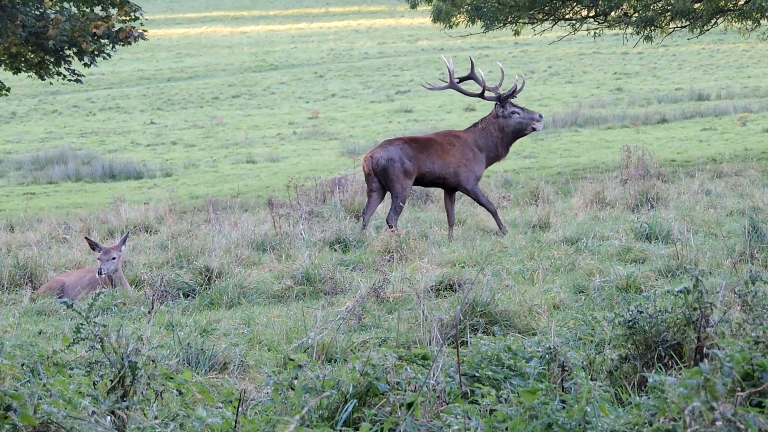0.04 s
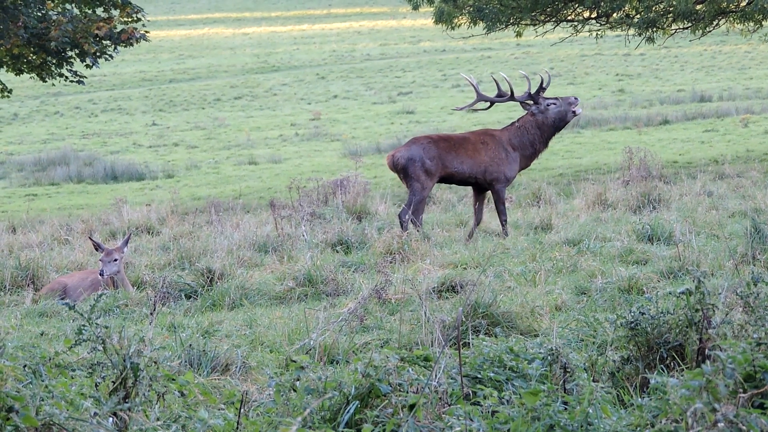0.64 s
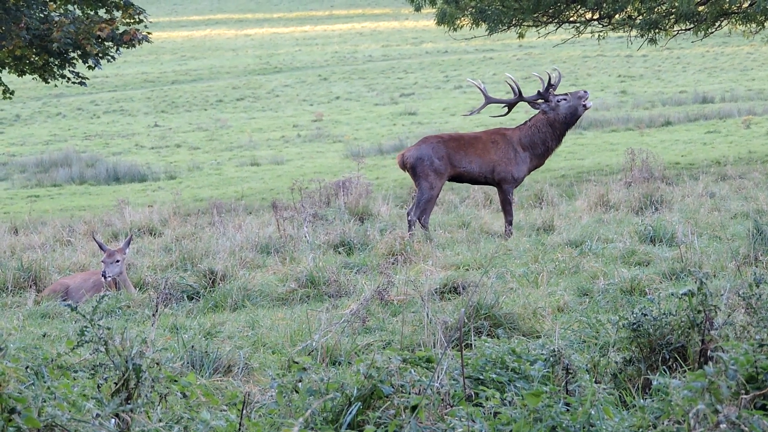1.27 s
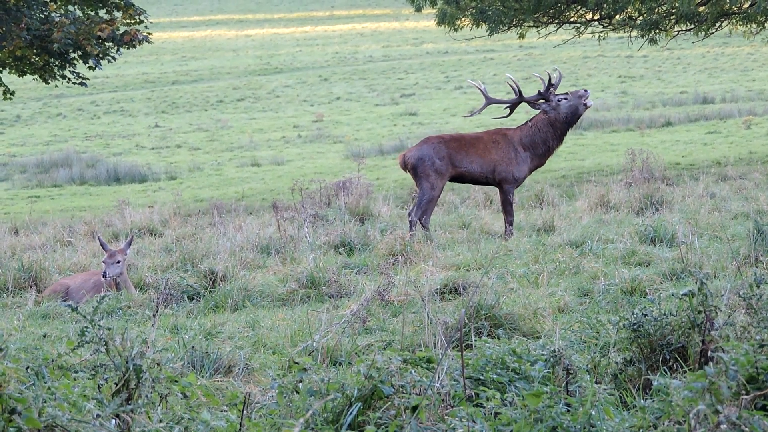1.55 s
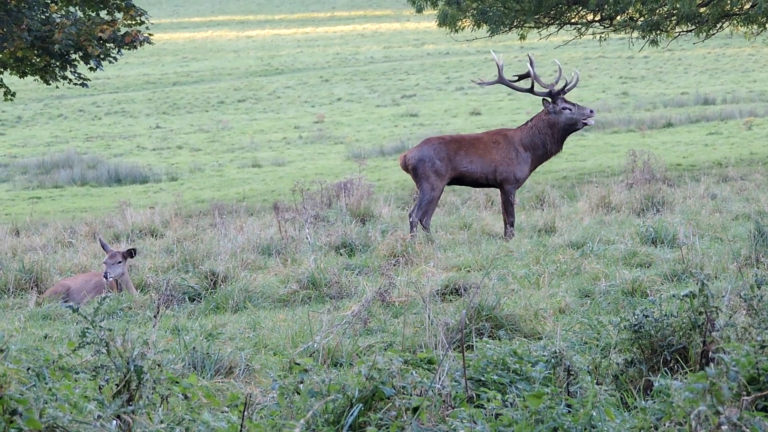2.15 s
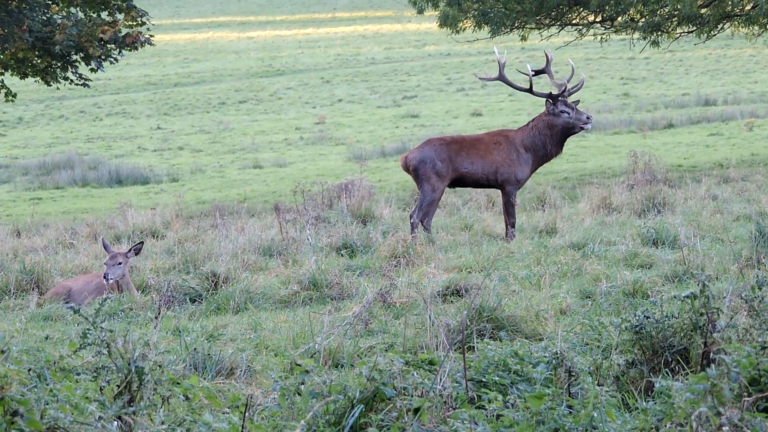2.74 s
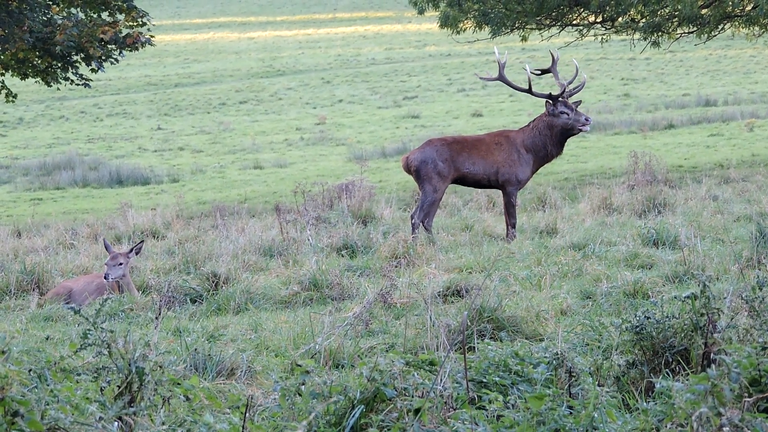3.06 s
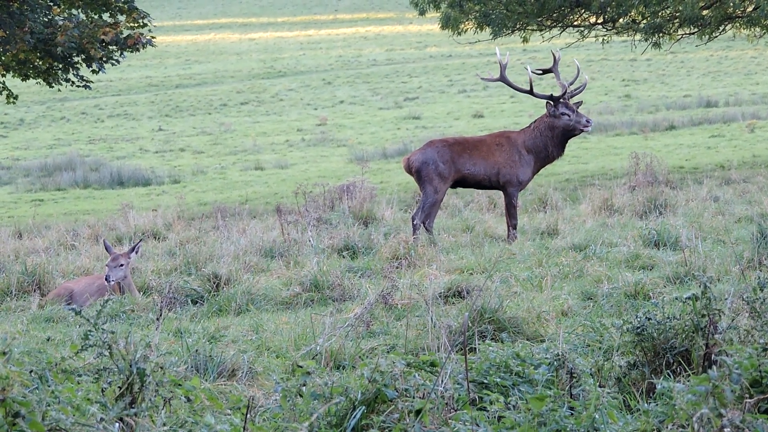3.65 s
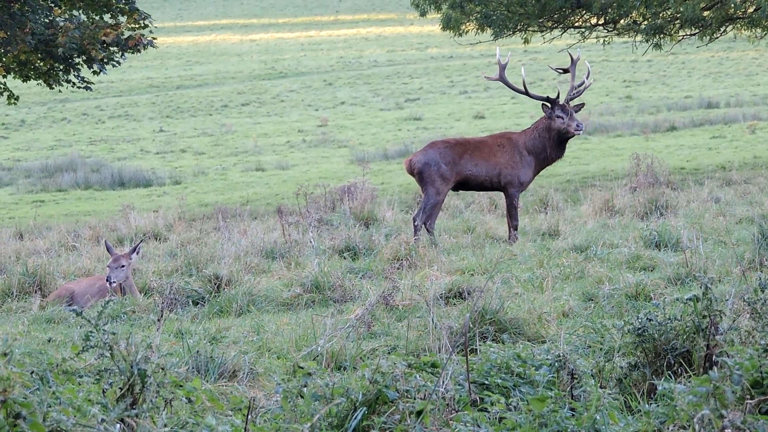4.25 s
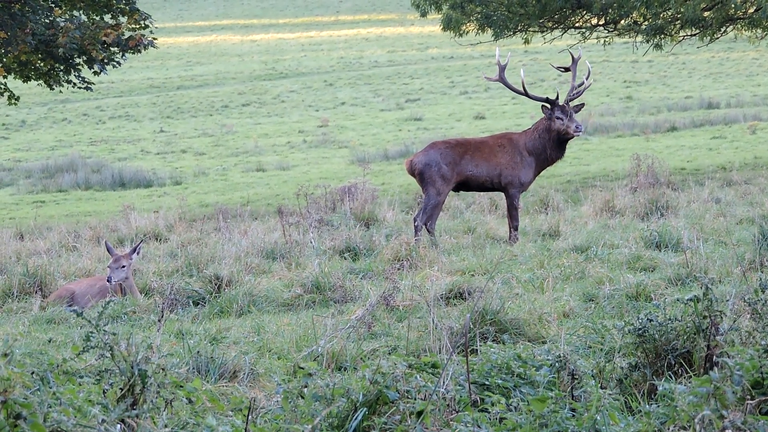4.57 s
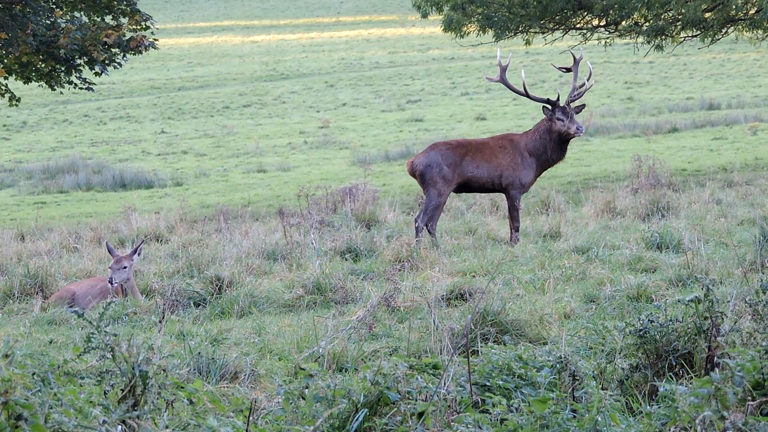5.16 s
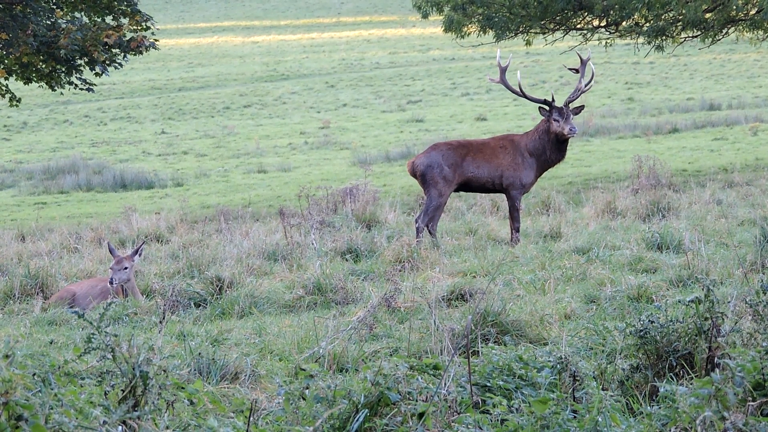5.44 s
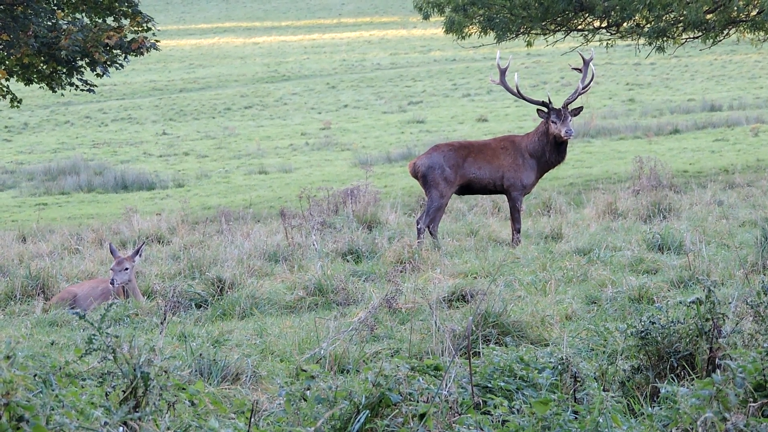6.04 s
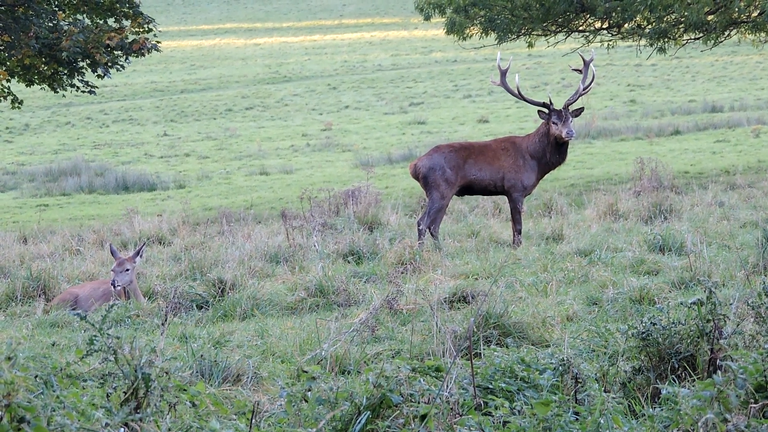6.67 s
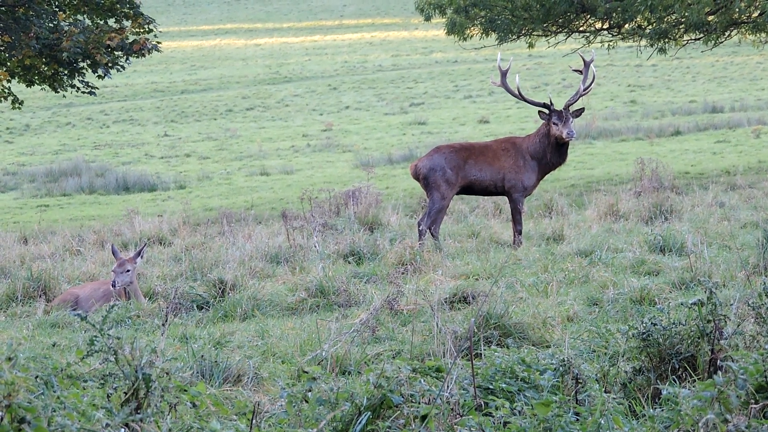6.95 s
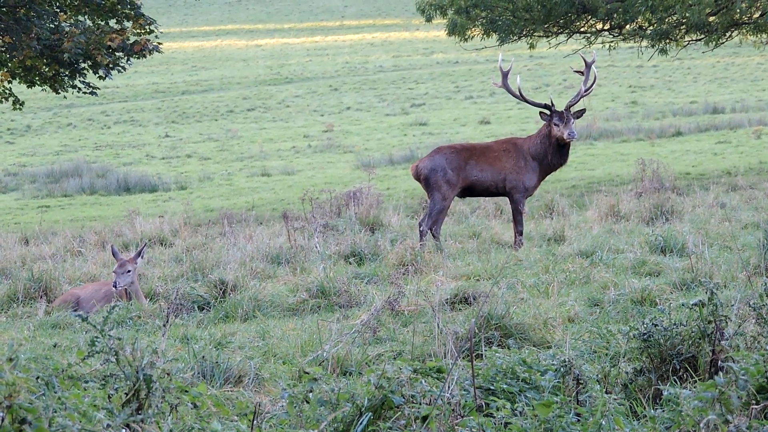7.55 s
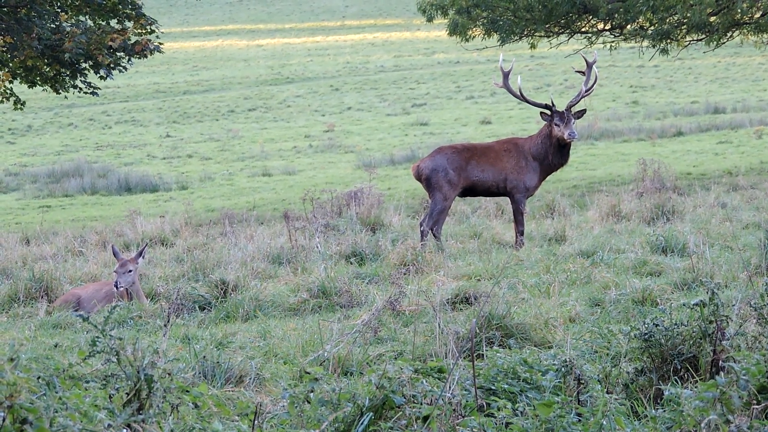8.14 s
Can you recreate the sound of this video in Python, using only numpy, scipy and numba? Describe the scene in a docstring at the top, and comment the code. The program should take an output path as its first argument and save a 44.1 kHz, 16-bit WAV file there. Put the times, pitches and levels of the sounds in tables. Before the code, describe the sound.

A deer roars hoarsely, then groans three times, before faint crows and a distant rival stag sound over soft outdoor hiss.

```python
"""Red deer stag roaring in a pasture

A puff of air, one long harsh bellow, then three short groans that sink into separate pulses.
Pulses from his vocal folds ring his throat, which lengthens as he stretches his neck; trees echo it.
Jackdaws, rooks, a rival stag and one hoot sound far off over the hiss of the field.
The grass rustles briefly and a twig snaps."""
import sys
import numpy as np
from scipy import signal
from scipy.fft import rfft, irfft, next_fast_len
from scipy.io import wavfile
from scipy.ndimage import uniform_filter1d
from numba import njit

SR = 44100
rng = np.random.default_rng(int(sys.argv[2]) if len(sys.argv) > 2 else 0)


def inscribe(sig):
    """Save sig as 16-bit PCM at rate SR to the path in sys.argv[1].

    A 1-D sig is mono; a 2-D sig holds one channel per row.
    Samples are clipped to [-1, 1] before scaling.
    """
    pcm = np.round(np.clip(np.atleast_2d(sig).T, -1, 1) * 32767)
    wavfile.write(sys.argv[1], SR, pcm.astype(np.int16))


N = 370881
T = np.arange(N) / SR

FIELD_SPECTRUM = [(15, -68), (25, -38), (166, -23), (366, -21), (477, -15), (573, -12), (971, -1),
                  (1170, -3), (1690, 0.35), (2500, -3), (3260, -8), (4240, -10), (12500, -19), (13500, -21)]  # air and leaves (frequency [Hz], relative density [dB])
NOISE_LIKENESS = [(60, 0.48), (150, 0.99), (300, 0.75), (700, 0.7), (1400, 0.3), (3100, 0.23), (7000, .1),
                  (14000, .15)]  # left-right likeness (frequency [Hz], nominal likeness [0-1])
FIELD_HISS = [(0.8, -41.5), (1.2, -46.5), (2.2, -41.5), (8.41, -42)]  # (time [s], level [dB])
GRASS_SWISHES = [(0.201, 0.067, -53), (0.48, 0.14, -51), (1.761, 0.093, -39), (3.751, 0.2, -32.5),
                 (4.24, 0.69, -46.5)]  # (start [s], length [s], level [dB])
GRASS_SPECTRUM = [(2500, -6), (4500, 9), (8000, 10), (13000, 8), (15500, -5)]  # (frequency [Hz], relative density [dB])
TWIG_SNAPS = [(5.2535, -14.5)]  # (time [s], level [dB])

# resonance banks (nominal centre [Hz], nominal width [Hz], gain [dB])
CHEST_MODES = [(197, 42, 3), (343, 80, -1.5), (522, 90, 2.5)]
MOUTH_MODES = [(878, 43, 0.89), (1055, 106, -2), (1268, 105, 0.23)]
THROAT_MODES = [(1540, 125, -3.5), (1800, 165, 0), (2170, 170, -4.5), (2560, 140, -12.5)]
RASP_MODES = [(2900, 400, -8), (3270, 220, 0), (3620, 450, -7), (4200, 650, -10), (6500, 3000, -22)]
BLARE_MODES = [(2635, 137, 0.5), (2853, 260, -5.5)]  # wide-open mouth
RIVAL_MODES = [(870, 250, -13), (1400, 200, -3), (1700, 320, 0), (2300, 900, -6), (3200, 700, -17)]

# voiceless puffs (start [s], end [s], level [dB], mouth [dB], rasp [dB], resonance scale [ratio])
AIR_PUFFS = [(0.208, 0.23, -27, -10.5, -7.5, 1.085), (2.1, 2.2, -43.5, -3, -19, 1.08),
             (2.326, 2.386, -30.5, -15.5, -21, 1.13), (2.452, 2.564, -35, -25, -18, 0.98),
             (3.302, 3.363, -36, -12, -10, 1.06), (4.191, 4.4, -41.5, -26, -7, 0.91)]
# vocal folds (time [s], pitch [Hz], roughness [0-1], air share [0-1], strong-weak alternation [0-1])
BELLOW_SOURCE = [(0.26, 175, .8, .65, 0), (0.46, 188, .7, .6, .1), (0.55, 190, .45, .35, .35),
                 (0.68, 188, .35, .3, .45), (0.71, 160, .3, .25, 0), (0.78, 158, .25, .2, 0),
                 (0.83, 177, .58, .5, 0), (1.1, 178, .52, .42, 0), (1.46, 173, .5, .38, 0),
                 (1.6, 171, .3, .25, 0), (1.74, 170, .4, .35, 0), (1.825, 166, .6, .6, 0)]
# bellow layers (time [s], level [dB])
BELLOW_EFFORT = [(0.26, -29), (0.29, -22), (0.32, -21), (0.355, -18.5), (0.41, -20.5), (0.445, -17.5),
                 (0.5, -24), (0.785, -26.5), (0.8, -22), (0.818, -29), (0.894, -25), (0.99, -26),
                 (1.016, -32), (1.028, -21.5), (1.05, -28), (1.13, -23.5), (1.152, -30.5), (1.25, -24),
                 (1.488, -28.5), (1.51, -27.5), (1.526, -32.5), (1.57, -23), (1.6, -25.5), (1.626, -37),
                 (1.672, -27), (1.726, -32), (1.748, -24.5), (1.77, -43), (1.8, -32)]
BELLOW_LOW_MOUTH = [(0.26, -36), (0.5, -37), (0.576, -30), (0.69, -40.5), (0.722, -34.5), (1.146, -32.5),
                    (1.16, -37.5), (1.4, -32), (1.66, -32), (1.8, -38.5)]
BELLOW_BRIGHT_BLARE = [(0.26, -40), (0.5, -30.5), (0.632, -27), (0.714, -34.5), (0.76, -28), (0.9, -37),
                       (0.936, -26), (0.984, -36), (1.3, -34), (1.8, -37)]
BELLOW_TREBLE_RASP = [(0.26, -56), (0.47, -44), (0.53, -38.5), (0.68, -39), (0.71, -30.5), (0.8, -34),
                      (0.875, -42), (0.897, -29), (0.925, -33.5), (0.958, -31), (0.99, -39), (1.1, -42.5),
                      (1.2, -42), (1.25, -38), (1.39, -37.5), (1.49, -46), (1.54, -39), (1.8, -52)]
BELLOW_HISS = [(0.26, -45), (0.42, -46), (0.55, -46), (0.7, -58), (0.8, -75)]
BELLOW_FUNDAMENTAL = [(0.26, -78), (0.42, -68), (0.52, -55), (0.68, -54.5), (0.72, -66), (0.95, -64),
                      (1.45, -63), (1.7, -62), (1.825, -66)]
FOLD_KNOCKS = [(0.2922, -9), (0.2976, -9), (0.317, -15), (0.3277, -9), (0.3387, -13), (0.3497, -11),
               (0.3552, -9), (0.366, -11), (0.377, -10), (0.3931, -9), (0.4046, -14), (0.415, -11),
               (0.453, -13), (0.4757, -13), (0.4862, -13), (0.5593, -17), (0.6765, -15), (0.706, -16),
               (0.7995, -13)]  # (time [s], peak [dB])

# (start [s], level [dB], starting pitch [Hz], roughness [ratio], overtone [dB])
JACKDAW_CHACKS = [(1.366, -25.5, 2390, 0.55, -13), (1.634, -22, 2375, 0.34, -18),
                  (1.683, -29.5, 2390, 0.9, -16), (1.966, -18.5, 2397, .2, -30),
                  (2.303, -17.5, 2393, .25, -31), (2.338, -28, 2340, .6, -16), (2.37, -29, 2140, .7, -22),
                  (2.828, -20.5, 2116, .4, -22), (3.079, -32, 2451, 0.35, -22),
                  (3.362, -29, 2430, 0.75, -27), (3.662, -25, 2455, .4, -25), (3.985, -28.5, 2420, .5, -17),
                  (4.215, -35, 1996, 0.84, -25), (4.662, -34, 1840, .6, -25), (4.785, -35.5, 2430, .9, -25),
                  (4.8, -29.5, 1840, 0.45, -25), (5.033, -37, 2610, 1.0, -25), (5.665, -42, 2400, .4, -25),
                  (5.69, -40, 2710, .4, -25), (5.706, -39, 2370, 0.5, -25), (5.732, -37, 1880, .4, -25),
                  (5.77, -39, 2060, 0.7, -25), (5.856, -33.5, 2750, 0.7, -25), (5.888, -33, 2050, .35, -25),
                  (5.9, -41, 2550, .5, -25), (6.618, -30, 2598, 0.64, -25), (6.642, -35, 2220, .9, -25),
                  (7.236, -36.5, 2370, 1.1, -25)]
# (start [s], attack [s], crest [s], end [s], crest level [dB], sag [dB/s], chest [dB],
#  resonance spreading [1/s], crest roughness [0-1])
GROAN_CALLS = [(1.814, 0.0042, 1.93, 2.09, -20, 37, -31, 0.04, .13),
               (2.635, .022, 2.74, 2.915, -19.5, 23, -46, 0.22, .085),
               (3.35, 0.047, 3.701, 3.95, -21, 32, -48, 0.12, .075)]
GROAN_MELODIES = [
    [(1.825, 127), (1.99, 113), (2.04, 112), (2.2, 95)],
    [(2.63, 157), (2.67, 168), (2.71, 171.5), (2.75, 163), (2.8, 147), (2.92, 141), (3.02, 115)],
    [(3.35, 138), (3.43, 135), (3.49, 125), (3.58, 124.5), (3.71, 114.3), (3.83, 108), (3.9, 101),
     (4.0, 85)],
]  # per groan (time [s], pitch [Hz])
# crest resonances per groan (centre [Hz], width [Hz], gain [dB], change [dB/s])
GROAN_MODES = [
    [(846, 51, -7, -16), (1010, 80, -10.5, 4), (1216, 54, -5.5, 13), (1568, 93, -3, -7),
     (1714, 166, 2.5, -2), (2090, 200, -6.5, -10), (2285, 96, -7, -6), (2720, 170, -15, -7),
     (3230, 160, -14.5, 28), (3580, 230, -23, 52), (4600, 1500, -36, 15)],
    [(890, 300, -26, -19), (1177, 120, -16.5, -9), (1380, 140, -15.5, 8), (1830, 165, 1.5, 0),
     (2090, 240, -2.5, -22), (2600, 190, -14.5, -4), (2980, 110, -15.5, 28), (3590, 95, -19, -10),
     (4520, 1400, -34, 4)],
    [(950, 270, -29, 4), (1336, 170, -15.5, -7), (1590, 250, -12.5, 12), (1840, 216, -1, -3),
     (2180, 190, -10, -14), (2710, 200, -19.5, 5), (3154, 130, -14, 10), (3740, 400, -27.5, 22)],
]
RIVAL_CALLS = [(4.165, 4.473, -41.5, 1644), (4.531, 4.85, -42, 1686), (5.09, 5.398, -42.5, 1704),
               (5.76, 6.149, -46, 1626), (6.59, 7.077, -46, 1685), (7.241, 7.602, -43.5, 1690),
               (7.8, 8.1, -49.5, 1710)]  # (start [s], end [s], level [dB], main resonance [Hz])
FAR_HOOTS = [(5.146, .042, -39, 850)]  # (start [s], length [s], level [dB], pitch [Hz])
# (start [s], length [s], level [dB], pitch [Hz], beak resonance [Hz], beak gain [dB])
ROOK_CAWS = [(6.607, 0.092, -39, 424, 2535, -2), (6.904, 0.13, -40.5, 428, 2565, -3),
             (7.232, 0.089, -37.5, 419, 2500, -8), (7.384, 0.13, -39, 441, 2600, -10),
             (7.8, 0.158, -41.5, 407.4, 2367, -12), (7.988, 0.15, -42.5, 420, 2490, -11),
             (8.322, 0.065, -43, 421, 2400, -14)]
# (centre [Hz], width [Hz], gain [dB])
ROOK_MODES = [(1390, 190, -3.0), (1610, 170, -0.5), (2320, 840, -2.0)]
TREE_ECHOES = [(.034, -23, -19), (.066, -17, -16), (.148, -22, -23)]  # (delay [s], left [dB], right [dB])


def from_db(db):
    """Decibels to gain."""
    return 10 ** (np.asarray(db) / 20)


def unit_rms(x):
    """Scale to unit power."""
    return x / np.sqrt(np.mean(x ** 2) + 1e-20)


def levelled(x):
    """Hold short-term power at one."""
    return x / np.sqrt(np.abs(uniform_filter1d(x ** 2, size=2600)) + 1e-12)


def in_time(rows, t=T):
    """Each column of a curve at times t."""
    times, *columns = np.transpose(rows)
    return [np.interp(t, times, column) for column in columns]


def at_hz(points, hz):
    """Interpolate a spectrum over log frequency."""
    knots_hz, values = np.transpose(points)
    return np.interp(np.log(hz + 1), np.log(knots_hz), values)


def span(start, end):
    """Sample times from start to end."""
    return T[(T >= start) & (T < end)]


def placed(t, x):
    """x at times t, silence elsewhere."""
    return np.interp(T, t, x, left=0, right=0)


def envelope(t, start, end, attack_s, release_s):
    """Rise, hold until end, decay."""
    return np.clip((t - start) / attack_s, 0, 1) * np.exp(-np.maximum(t - end, 0) / release_s)


def arch(start, length_s):
    """Half-sine envelope."""
    return np.sin(np.pi * np.clip((T - start) / length_s, 0, 1))


def drift(rate_hz, size=N):
    """Random wander, unit RMS."""
    knots = rng.standard_normal(int(N / SR * rate_hz) + 3)
    return unit_rms(np.interp(T[:size] * rate_hz, np.arange(len(knots)), knots))


def cut(x, hz, kind, order=2):
    """Butterworth filter."""
    sos = signal.butter(order, np.minimum(hz, .45 * SR), kind, fs=SR, output="sos")
    return signal.sosfilt(sos, x + 1e-18)


def stereo_noise(spectrum):
    """Coloured noise, alike at both ears in the bass, unrelated in the treble."""
    size = next_fast_len(N)
    hz = np.arange(size // 2 + 1) * SR / size
    mid, side = rfft(rng.standard_normal((2, size))) * from_db(at_hz(spectrum, hz))
    alike = np.clip(at_hz(NOISE_LIKENESS, hz) - np.interp(hz, [1500, 4000], [.03, .25]), 0, 1)
    ears = np.sqrt(1 + alike) * mid + np.sqrt(1 - alike) * side * [[1], [-1]]
    return unit_rms(irfft(ears, size)[:, :N])


@njit
def resonate(x, hz, width_hz):
    """Moving two-pole resonance, unit peak gain."""
    y = np.zeros(len(x))
    for i in range(2, len(x)):
        r = 1 - np.pi * width_hz[i] / SR
        feedback = 2 * r * np.cos(2 * np.pi * hz[i] / SR) * y[i - 1] - r * r * y[i - 2]
        y[i] = (1 - r * r) / 2 * (x[i] - x[i - 2]) + feedback
    return y


def formant(source, hz, width_hz, wander_hz=12, wander_db=1.3):
    """Steep resonance, wandering slightly in centre and gain."""
    size = len(source)
    widths = np.minimum(width_hz * np.ones(size), SR / 12)
    centre = hz + .06 * widths * drift(wander_hz, size)
    gain = from_db(wander_db * drift(wander_hz, size))
    return gain * resonate(resonate(source, centre, widths), centre, widths)


def tract(source, modes, scale, side_db=0, tilt_db_oct=0, blur=1):
    """Parallel formants; all but the strongest are attenuated and tilted."""
    main_hz, _, top_db = max(modes, key=lambda mode: mode[2])
    return sum(from_db(db + side_db * (db < top_db) + tilt_db_oct * np.log2(hz / main_hz))
               * formant(source, hz * scale, width_hz * blur) for hz, width_hz, db in modes)


def field(split_hz=3600, murmur_db=-39, waver_db=1.0):
    """Murmur of distant air and leaves, fine hiss above."""
    (hiss_db,) = in_time(FIELD_HISS)
    air = cut(stereo_noise(FIELD_SPECTRUM), 14320, "low", order=18)
    murmur = unit_rms(cut(air, split_hz, "low", order=3))
    hiss = unit_rms(cut(air, split_hz, "high", order=3))
    return from_db(murmur_db + waver_db * drift(8)) * murmur + from_db(hiss_db) * hiss


def grass(grain_db=2.5, snap_s=.0012):
    """Grainy swishes of stalks; a twig snaps."""
    level = sum(from_db(db) * arch(start, length_s) for start, length_s, db in GRASS_SWISHES)
    snap = sum(from_db(db) * (T >= s) * np.exp(-np.abs(T - s) / snap_s) for s, db in TWIG_SNAPS)
    crack = cut(snap * rng.standard_normal(N), [900, 7000], "band")
    return level * from_db(grain_db * drift(500)) * stereo_noise(GRASS_SPECTRUM) + crack


def voice(source, chest_db, mouth_db, rasp_db, scale, lips_db, tilt_db_oct, shut=0):
    """The source rings the throat; chest, mouth and rasp levels are relative to it."""
    blur = scale ** 2 * from_db(0.063 * lips_db)  # high larynx broadens, round lips sharpen
    chest = cut(tract(source, CHEST_MODES, 0.97, tilt_db_oct=-.5 * tilt_db_oct), 127, "high", order=3)
    mouth = levelled(tract(source, MOUTH_MODES, scale, side_db=0.45 * lips_db, blur=blur))
    throat = tract(source, THROAT_MODES, scale, lips_db, tilt_db_oct, blur)
    throat = levelled(cut(throat, 2850, "low", order=5))
    rasp = tract(source, RASP_MODES, scale ** 0.45, .5 * lips_db, tilt_db_oct, blur * scale ** 2)
    rasp = cut(rasp, 1930, "high", order=3)
    # nearly shut mouth: one broad resonance
    squeezed = cut(throat + from_db(-0.5) * mouth, [1520, 2330], "band")
    throat = (1 - shut) * throat + shut * levelled(squeezed)
    return (levelled(throat) + from_db(chest_db) * levelled(chest)
            + from_db(mouth_db) * mouth + from_db(rasp_db) * levelled(rasp))


def puffs(attack_s=0.0053, release_s=0.076, chest_db=-42, teeth_hz=(2300, 5500)):
    """Air alone rushes through the stag's throat and hisses past his teeth."""
    out = 0
    for start, end, db, mouth_db, rasp_db, scale in AIR_PUFFS:
        t = span(start, end + 5 * release_s)
        air = rng.standard_normal(N)[:len(t)]
        sound = voice(air, chest_db, mouth_db, rasp_db, scale, lips_db=-2, tilt_db_oct=2.0)
        sound += from_db(rasp_db) * levelled(cut(rng.standard_normal(N)[:len(t)], teeth_hz, "band"))
        out += placed(t, from_db(db) * envelope(t, start, end, attack_s, release_s) * sound)
    return out


def folds(pitch_hz, rough, breath, doubling=0, jitter=.09, shimmer_db=4.0, hoarse_hz=3500):
    """One pulse per cycle, uneven when rough; the opening gates air noise and treble turbulence."""
    size = len(pitch_hz)
    cycles = np.cumsum(pitch_hz * (1 + jitter * .5 * rough * drift(45, size))) / SR
    opening = np.exp(-4 * (cycles % 1))
    air, burst = (unit_rms(rng.standard_normal(N)[:size] * (leak + opening)) for leak in (0.86, 0.25))
    onsets = np.flatnonzero(np.diff(np.floor(cycles)))
    level_draw, time_draw = rng.standard_normal((len(onsets), 2)).T
    alternation = 1 + (doubling + .25 * rough)[onsets] * (-1) ** np.arange(len(onsets))
    strength = from_db(shimmer_db * rough[onsets] * np.clip(level_draw, -2, 2)) * alternation
    slip = jitter * rough[onsets] ** 2 * time_draw * SR / pitch_hz[onsets]
    place = np.clip(onsets + slip, 0, size - 2)
    train = np.zeros(size)
    train[place.astype(int)] = strength * (1 - place % 1)
    train[place.astype(int) + 1] += strength * (place % 1)
    pulses = cut(levelled(train), hoarse_hz, "low", order=3) + cut(burst, hoarse_hz, "high", order=3)
    air_share = np.clip(breath, 0, 1)
    return np.sqrt(1 - air_share) * pulses + np.sqrt(air_share) * air


def bellow(sink_start_s=0.21, sink_s=0.414, lips_db=-1, hiss_hz=(3900, 7000), fade_s=.005):
    """A tight growl deepens to a harsh, throbbing roar as the larynx sinks."""
    start, end = BELLOW_SOURCE[0][0], BELLOW_SOURCE[-1][0]
    t = span(start, end)
    pitch_hz, rough, breath, doubling = in_time(BELLOW_SOURCE, t)
    effort_db, mouth_db, blare_db, rasp_db, hiss_db, hum_db = (in_time(curve, t)[0] for curve in (
        BELLOW_EFFORT, BELLOW_LOW_MOUTH, BELLOW_BRIGHT_BLARE, BELLOW_TREBLE_RASP,
        BELLOW_HISS, BELLOW_FUNDAMENTAL))
    larynx = np.exp(-((t - sink_start_s) / sink_s) ** 2)  # 0 sunk, 1 high
    scale = np.interp(larynx, [0, 1], [0.97, 1.39])
    tilt_db_oct = np.interp(larynx, [0, 1], [-7, -21])
    throat_db = effort_db + np.interp(larynx, [0, 1], [0.5, -2.5])
    chest_db = np.interp(larynx, [0, 1], [-47, -71])
    shut = np.clip(3 * (larynx - 0.25), 0, 1)
    source = folds(pitch_hz, rough, breath, doubling)
    sound = from_db(throat_db) * voice(source, chest_db - throat_db, mouth_db - throat_db,
                                       rasp_db - throat_db, scale, lips_db, tilt_db_oct, shut)
    sound += from_db(blare_db) * levelled(tract(source, BLARE_MODES, 0.94))
    sound += from_db(hiss_db) * levelled(cut(source, hiss_hz, "band"))
    sound += from_db(hum_db) * np.sqrt(2) * np.sin(2 * np.pi * np.cumsum(pitch_hz) / SR)
    fade = np.clip(np.minimum(t - start, end - t) / fade_s, 0, 1)
    throb = from_db(0.9 * (0.5 - larynx) * drift(28.8, len(t)))
    return placed(t, fade * throb * sound)


def knocks(band_hz=(1450, 2900), top_hz=3300):
    """Slack folds slap shut and knock on the nearly closed mouth."""
    clicks = np.zeros(N)
    for s, db in FOLD_KNOCKS:
        clicks[int(s * SR)] = from_db(db)
    knock = cut(cut(signal.unit_impulse(SR // 100), band_hz, "band"), top_hz, "low", order=4)
    return signal.oaconvolve(clicks, knock / np.abs(knock).max())[:N]


def jackdaws(length_s=0.0458, undertone_db=-20):
    """Each chack is a tone that swells fast and slides down; rough ones break up."""
    out = np.zeros(N + SR)
    size = int(length_s * SR)
    progress = np.arange(size) / (length_s * SR)
    swell = np.sin(np.pi * progress ** 0.49) ** 2
    for s, db, hz, rough, overtone_db in JACKDAW_CHACKS:
        fall = 0.309 * (1 - .5 * rough) * progress ** 1.474
        phase = 2 * np.pi * np.cumsum(hz * (1 - fall + .02 * rough * drift(700, size))) / SR
        tone = np.sin(phase) + from_db(overtone_db) * np.sin(2 * phase)
        tone += from_db(undertone_db) * np.sin(phase / 2)
        broken = unit_rms(1 + .8 * rough * drift(220, size))
        out[int(s * SR):int(s * SR) + size] += from_db(db) * swell * broken * tone
    return out[:N]


def groans(swell_db_s=19, release_s=0.032, sink_per_s=0.011):
    """Each groan crests and sags as the mouth changes shape; the folds roughen at low effort."""
    out = 0
    for call, melody, modes in zip(GROAN_CALLS, GROAN_MELODIES, GROAN_MODES):
        start, attack_s, crest, end, db, sag_db_s, chest_db, spread, crest_rough = call
        t = span(start, end + 5 * release_s)
        (pitch_hz,) = in_time(melody, t)
        late_s = t - crest
        effort = from_db(np.minimum(swell_db_s * late_s, -sag_db_s * late_s))
        effort *= envelope(t, start, end, attack_s, release_s)
        rough = crest_rough + 0.15 * (1 - effort) ** 2
        source = folds(pitch_hz, rough, breath=1.27 * rough)
        main_hz = max(modes, key=lambda mode: mode[2])[0]
        throat = 0
        for hz, width_hz, gain_db, change_db_s in modes:
            centre_hz = hz * (hz / main_hz) ** (spread * late_s) * (1 - sink_per_s * late_s)
            throat += from_db(gain_db + change_db_s * late_s) * formant(source, centre_hz, width_hz)
        chest = cut(tract(source, CHEST_MODES, 0.97), 210, "high", order=3)
        out += placed(t, from_db(db) * effort * (levelled(throat) + from_db(chest_db) * levelled(chest)))
    return out


def rival(pitch_hz=125, rough=.6, breath=0.37, attack_s=0.0097, release_s=0.078):
    """Far, wavering stag; only the middle resonances carry, sinking through each roar."""
    out = 0
    for start, end, db, hz in RIVAL_CALLS:
        t = span(start, end + 4 * release_s)
        source = folds(pitch_hz * (1 + .08 * drift(3, len(t))), np.full(len(t), rough), breath)
        scale = hz / RIVAL_MODES[2][0] * (1 + .02 * drift(9, len(t)) - .25 * (t - (start + end) / 2))
        sound = levelled(cut(tract(source, RIVAL_MODES, scale), [700, 3600], "band"))
        sound *= from_db(1.8 * drift(14, len(t)))
        out += placed(t, from_db(db) * envelope(t, start, end, attack_s, release_s) * sound)
    return out


def hoots():
    """Brief, far, pure-toned call."""
    return sum(from_db(db) * arch(start, length_s) * np.sin(2 * np.pi * hz * T)
               for start, length_s, db, hz in FAR_HOOTS)


def rooks(rough=.35, breath=.25, beak_width_hz=95., attack_s=0.0044, release_s=0.0075):
    """Hoarse caws through a sharp beak resonance and three broader ones."""
    held = [(edge, *call) for s, length_s, _, *call in ROOK_CAWS for edge in (s, s + length_s / 2)]
    pitch_hz, beak_hz, beak_db = in_time(held)
    source = folds(pitch_hz, np.full(N, rough), np.full(N, breath))
    caw = from_db(beak_db) * resonate(source, beak_hz, np.full(N, beak_width_hz))
    caw += from_db(-1.5) * tract(source, ROOK_MODES, 1)
    level = sum(from_db(db) * np.clip(np.minimum((T - s) / attack_s, (s + length - T) / release_s), 0, 1)
                for s, length, db, *_ in ROOK_CAWS)
    return level * unit_rms(cut(caw, [1000, 3000], "band"))


def echoes(x):
    """Distinct, dulled reflections off the trees."""
    dull = cut(x, 6400, "low")
    return sum(from_db([[left], [right]]) * np.interp(T - delay_s, T, dull, left=0)
               for delay_s, left, right in TREE_ECHOES)


def scatter(x, t60_s, alike, build_s=0.0046):
    """Diffuse return from grass, trees and slopes."""
    t = T[:int(1.5 * SR)]
    mid, side = rng.standard_normal((2, len(t))) * from_db(-60 * t / t60_s) * (1 - np.exp(-t / build_s))
    side = cut(side, 1400, "high", order=1) * [[1], [-1]]
    tail = cut(np.sqrt(1 + alike) * mid + np.sqrt(1 - alike) * side, 12000, "low")
    return signal.fftconvolve(x[None], tail / np.sqrt(np.sum(mid ** 2) * 2), axes=1)[:, :N]


def scene():
    """Stag slightly right; far callers and treble carry more scattered sound."""
    stag = bellow() + knocks() + groans() + puffs()
    yelps = jackdaws() + hoots()
    far = rooks() + rival()
    callers = stag + yelps
    direct = stag * from_db([[-1.3], [0]]) + yelps
    meadow = from_db(-7.5) * scatter(callers, t60_s=.05, alike=-.5)
    meadow += from_db(-17) * scatter(callers, t60_s=.8, alike=.2)
    treble = from_db(-2.0) * scatter(cut(callers, 3700, "high"), t60_s=0.18, alike=-1)
    distant = from_db(-2.5) * far + from_db(2.5) * scatter(far, t60_s=0.39, alike=0.034)
    return direct + echoes(callers) + meadow + treble + distant + grass() + field()


def record(dry):
    """Brief opening silence; steep low-pass."""
    start_s, stopband_hz = .057, 16300
    return signal.sosfilt(signal.cheby2(14, 70, stopband_hz, fs=SR, output="sos"), dry * (T >= start_s))


dry = scene()
out = record(dry)
inscribe(out)
```